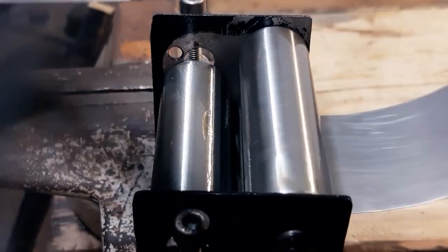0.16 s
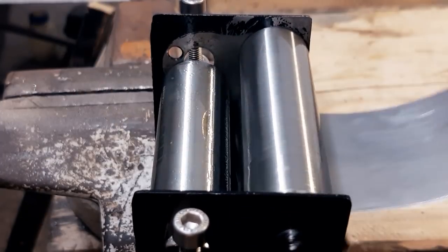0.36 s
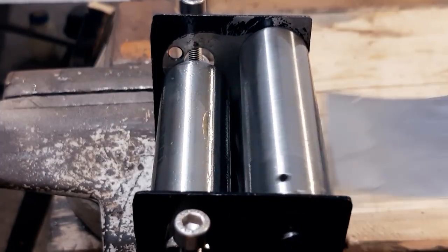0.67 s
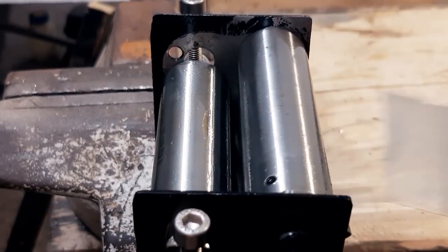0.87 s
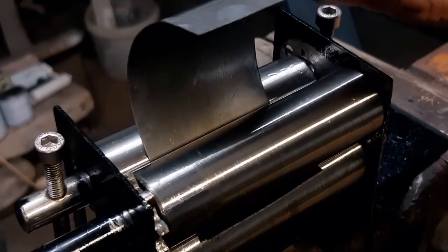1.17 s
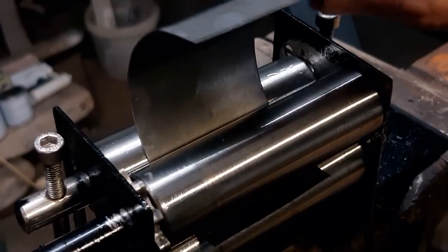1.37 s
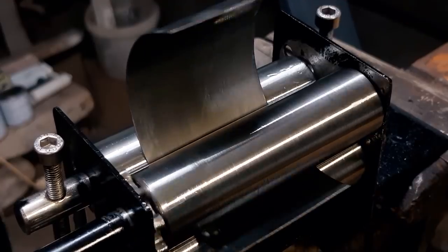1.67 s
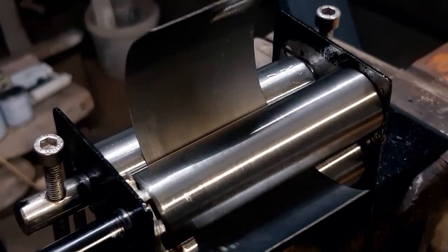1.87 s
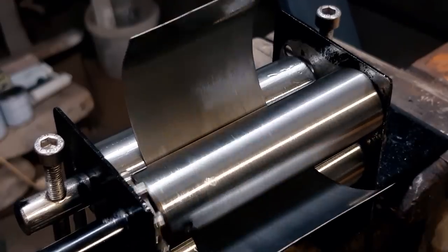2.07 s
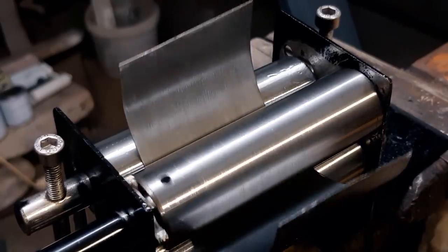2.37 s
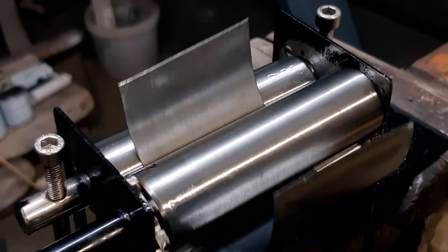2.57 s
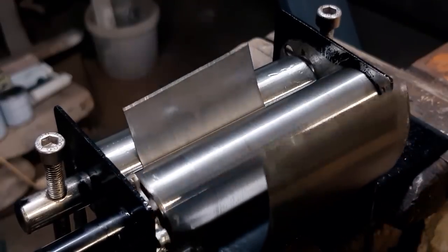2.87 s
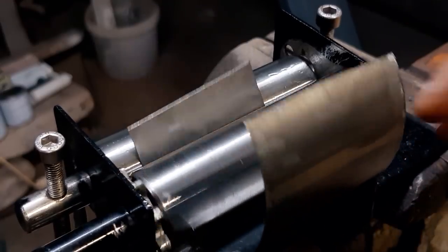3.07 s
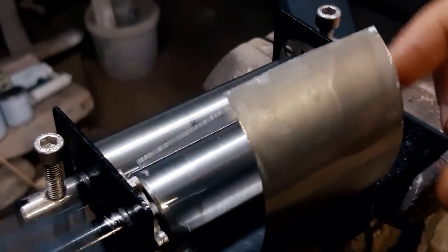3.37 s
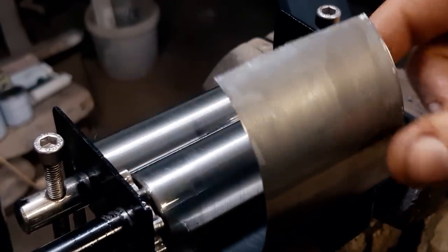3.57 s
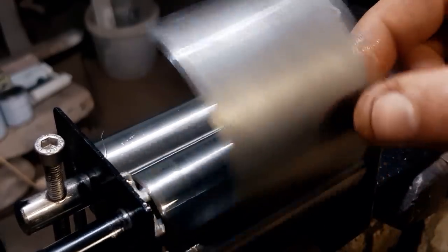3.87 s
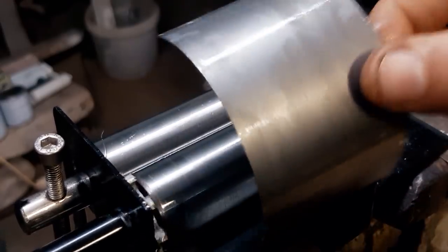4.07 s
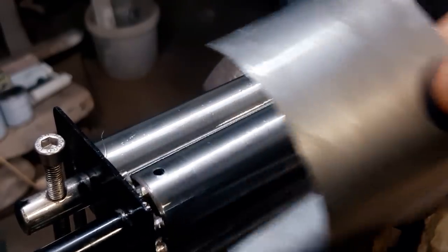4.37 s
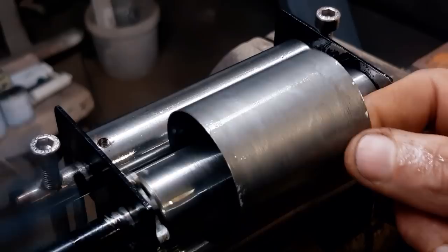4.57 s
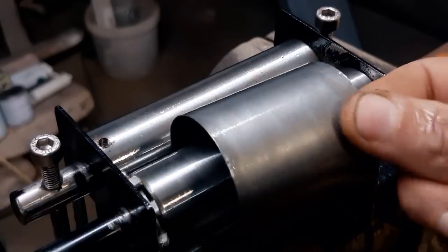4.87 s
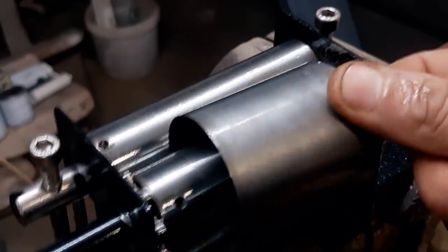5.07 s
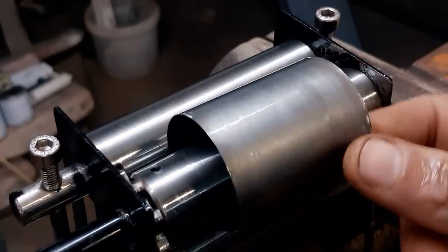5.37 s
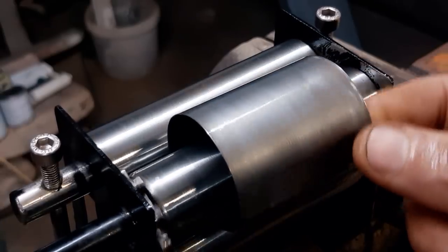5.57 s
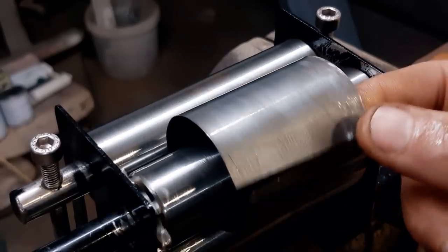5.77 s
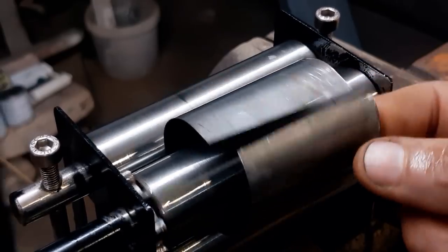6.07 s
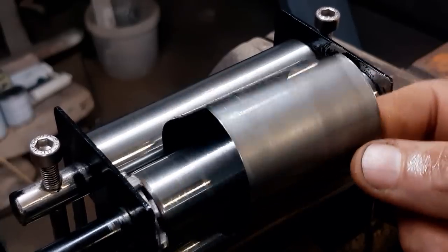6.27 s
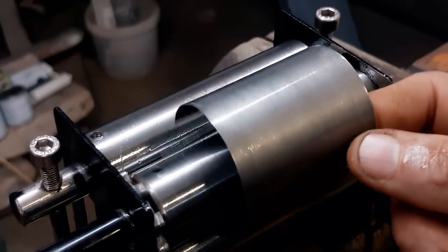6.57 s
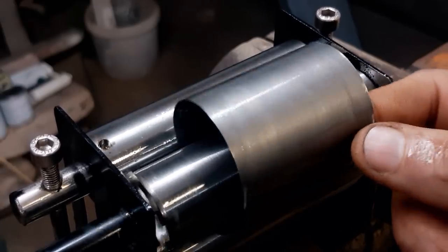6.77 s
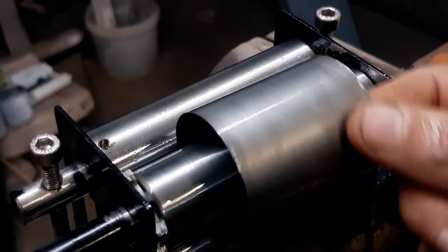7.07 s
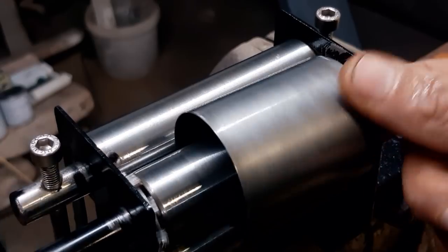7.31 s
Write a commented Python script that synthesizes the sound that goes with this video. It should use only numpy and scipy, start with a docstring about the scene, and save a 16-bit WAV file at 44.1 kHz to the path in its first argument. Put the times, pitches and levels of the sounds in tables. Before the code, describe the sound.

Close stereo microphone at a workshop bench roller. A thin metal sheet slides through with fine, very high hiss and coarser rasp, first in small scuffs and ticks, then a quieter stretch with faint squeals. Sharp snaps follow, the loudest single tick about midway, and the second half grows busy with clacks, rustles and scrapes. Soft vice knocks and a low wavering bench hum sit beneath steady room air.

```python
"""In a workshop, a thin metal sheet is cranked through a small bench roller, close to a two-port microphone.
The sheet hisses and rasps on the rolls (shaped noise and tiny clicks) and snaps on steel (short noise
bursts through resonances, with a room tail). Thin squeals glide up and down (wandering sines). Below, the
bench hums and swells in its low modes (wavering sines) and the vice rings when knocked (noise through
resonances), all over the steady air of the workshop."""
import sys
import numpy as np
from scipy import signal
from scipy.fft import rfft, irfft, next_fast_len
from scipy.io import wavfile
from scipy.ndimage import uniform_filter1d, map_coordinates

SR = 44100
rng = np.random.default_rng(int(sys.argv[2]) if len(sys.argv) > 2 else 0)


def unload_audio(sound):
    """Save the sound as a 16-bit wav file, at the path given as the first command line argument."""
    columns = np.transpose(np.atleast_2d(sound))
    # keep every value between -1 and 1, then stretch to whole-number steps
    steps = np.round(np.clip(columns, -1, 1) * 32767)
    wavfile.write(sys.argv[1], SR, steps.astype(np.int16))


N = 328104  # samples

# Steady air of the workshop, relative spectrum: (frequency [Hz], density [dB per Hz])
AIR_SPECTRUM = [(12, -23), (28, 6), (60, 8), (79, -13), (140, -16.5), (238, -28.5), (296, -24.5),
                (456, -34.5), (703, -31.5), (1130, -44), (2200, -55), (2860, -64), (4840, -120)]
# Steady friction on the rolls: (time [s], hiss level [dB], rasp level [dB])
FRICTION = [(0.0, -68, -83), (0.6, -62, -74), (0.78, -63.5, -79.5), (1.06, -60.5, -77),
            (1.45, -65.5, -77.5), (1.8, -61, -75), (2.25, -52.5, -67), (2.75, -64.5, -73.5),
            (3.2, -65, -77.5), (3.5, -61.5, -77), (3.8, -66.5, -86), (3.9, -54, -73), (4.3, -61.5, -72.5),
            (4.58, -68.5, -90), (4.66, -60, -74), (5.1, -56.5, -67.5), (5.42, -63.5, -76.5),
            (6.15, -60, -78), (6.36, -56.5, -67), (7.44, -53, -72)]
# Scuffs and rustles of the sheet; rise and fall each span 20 dB:
# (peak time [s], rise [s], fall [s], hiss level [dB], fizz level [dB], rasp level [dB])
SCUFFS = [(0.165, 0.18, 0.15, -54.5, -67.5, -69), (0.289, 0.01, 0.1, -50, -63, -63),
          (0.483, 0.1, 0.098, -48, -54.5, -63), (0.688, 0.13, 0.045, -61, -66, -64.5),
          (0.883, 0.16, 0.1, -60.5, -90, -103), (1.596, 0.096, 0.14, -56.5, -82, -76),
          (1.866, 0.068, 0.86, -56, -76, -81), (2.03, 0.034, 0.046, -40, -67, -76),
          (2.7, 0.14, 0.55, -56, -75, -73), (3.058, 0.0085, 0.15, -52.5, -93, -70.5),
          (3.403, 0.02, 0.097, -37.5, -65, -62.5), (3.885, 0.043, 0.042, -48.5, -76, -70),
          (4.04, 0.037, 0.064, -51.5, -70, -61.5), (4.144, 0.013, 0.088, -39.5, -57, -59),
          (4.425, 0.065, 0.13, -78, -95, -63.5), (4.633, 0.027, 0.12, -53, -75, -59),
          (4.744, 0.084, 0.03, -55, -72, -67.5), (4.843, 0.036, 0.12, -39.5, -60.5, -62.5),
          (4.828, 0.0084, 0.03, -36, -75, -54), (4.964, 0.12, 0.12, -40, -65.5, -55.5),
          (5.602, 0.14, 0.58, -53, -76.5, -74), (6.356, 0.31, 0.61, -50.5, -73, -89),
          (6.49, 0.045, 0.57, -53, -87, -65.5), (6.69, 0.066, 0.037, -40, -60.5, -74),
          (6.88, 0.26, 0.011, -48.5, -73, -68.5), (7.099, 0.032, 0.069, -45, -68, -57.5),
          (7.363, 0.11, 0.16, -49.5, -70, -61)]
# Relative spectra of the three rubbing noises: (frequency [Hz], density [dB per Hz])
HISS_SPECTRUM = [(7500, -49), (9500, -25), (11000, -10), (12500, -4), (14000, 2), (15300, 2), (16000, 0)]
FIZZ_SPECTRUM = [(4500, -30), (6900, -6.5), (8300, -15.5), (10000, -4.5), (12500, -14)]
RASP_SPECTRUM = [(450, -28), (750, -12.5), (1100, -22.5), (1500, -15.5), (1950, -19), (2180, -8.5),
                 (2900, -4), (4000, -2), (5500, -4), (6800, -7), (9000, -52)]
# The rasp narrows towards one band and widens again several times:
# (time [s], narrowed share [0-1], band centre [Hz], level of the rasp's low end [dB])
NARROWING = [(0, 0.56, 3700, -1), (1.9, 0.2, 3150, -0.5), (2.5, 0.36, 3300, -1), (2.9, 0.77, 3700, -3.5),
             (3.35, 0.57, 4010, -3), (3.45, 0.5, 3930, 2.5), (4.8, 0.13, 4020, 2), (5.05, .05, 4000, 9.5),
             (5.2, 0.77, 4400, 2), (5.6, 0.42, 4200, 1.5), (7.44, 0.03, 3900, 3.5)]
# How hard rolling and handling shake the vice and bench: (time [s], level [dB])
LOAD = [(0.0, -92), (0.6, -72.5), (1.41, -94.5), (2.38, -78), (3.32, -96), (3.9, -83), (4.06, -77.5),
        (5.16, -71.5), (5.39, -82), (6.07, -80), (6.67, -72), (7.44, -70.5)]
# Bench modes: (pitch [Hz], pitch wander [Hz], level over the shaking [dB])
BENCH_MODES = [(44.47, 2.933, 14), (60.65, 3.56, 6.5), (82.8, 1.5, 4.5), (91, 1.73, 2.5),
               (106.1, 2.7, -4.5)]
# Pushes on crank and bench, one list a mode; rise and fall each span 20 dB:
# (peak time [s], rise [s], fall [s], level [dB])
BENCH_SWINGS = [
    [(.81, 0.46, 0.22, -44), (2.1, 0.65, 0.26, -59.5), (2.55, 0.27, 0.24, -63.5), (4.48, 0.39, 0.13, -63.5),
     (5.72, 0.62, 0.43, -54.5), (6.6, 0.33, 0.41, -56), (7.13, 0.23, 0.13, -49), (7.38, 0.25, 0.85, -46.5)],
    [(2.36, 0.11, 0.39, -61.5), (2.8, 0.099, 0.062, -58.5), (4.22, 0.15, 0.072, -59.5),
     (4.7, 0.089, 0.03, -50), (5.14, 0.25, 0.12, -46.5), (5.6, 1, 0.14, -57), (6.62, 0.25, 0.35, -53.5),
     (7.27, 0.11, 0.19, -57)],
    [(6.24, 0.43, 0.86, -64.5)],
    [(6.85, 0.085, 0.79, -59.5), (7.15, 0.24, 0.39, -53.5)],
    [(.54, 0.15, 0.27, -71.5), (2.4, 0.14, 0.41, -70.5), (4.7, 0.17, 0.068, -60), (6.5, 0.089, 0.37, -69.5)],
]
# The bench stiffens or slackens under the hands: (time [s], pitch change of all modes [%])
STIFFENING = [(.9, -3), (1.4, 2), (4.9, 0), (5.8, -3), (6.2, 2.5), (7.44, 4)]
# The vice and its jaws: (mode pitch [Hz], bandwidth [Hz], relative level [dB])
VICE_MODES = [(178.4, 10.6, 3), (261.2, 9.3, -3.5), (297.1, 19, -3.5), (740, 24, -24), (850, 11, -16.5)]
# Hand and crank knock the vice: (time [s], lowest mode peak [dB], upper modes peak [dB])
KNOCKS = [(0.13, -72, -77), (0.289, -76, -64), (0.48, -70, -57.5), (0.646, -62, -58.5), (1.014, -84, -69.5),
          (2.119, -72.5, -68), (2.259, -74, -68), (2.5, -68, -66.5), (2.747, -62.5, -73), (3.9, -70, -61.5),
          (4.036, -60, -60), (4.134, -61, -55.5), (4.179, -71.5, -64.5), (4.335, -69.5, -67),
          (4.429, -87, -67), (4.475, -84, -62), (4.639, -61.5, -59.5), (4.955, -64.5, -54),
          (5.33, -71, -68.5), (5.56, -68, -66.5), (6.477, -70, -56.5), (6.976, -61, -59.5),
          (7.06, -71, -64), (7.345, -62.5, -62)]
# The sheet snaps on steel:
# (time [s], tick peak [dB], clack level [dB], clack pitch [Hz], left over right [dB])
SNAPS = [(0.091, -36, -67, 5050, -4), (0.2793, -28.5, -43.5, 3180, 5), (0.331, -40, -60, 2775, 5),
         (0.4812, -37, -47, 3450, -1), (0.6238, -73, -59.5, 3100, 0.5), (0.685, -46.5, -58, 4070, 0),
         (0.823, -44, -74, 2970, 11), (1.857, -41, -72, 3180, 3), (2.0195, -23.5, -64, 4450, 3),
         (2.033, -33, -62, 4260, 7), (2.1997, -34, -59.5, 5600, 7), (2.25, -42, -54, 3170, -3),
         (2.6596, -33, -65, 3780, 1), (2.726, -35, -68, 3820, 2), (3.051, -25.5, -68, 3720, 7),
         (3.3927, -9.5, -48.5, 5600, -5), (3.877, -29, -54.5, 5240, -11), (3.8858, -26.5, -50, 5160, -5),
         (3.9557, -39, -70, 4360, 3), (4.0247, -73, -54.5, 1820, -1), (4.025, -39, -56.5, 3830, -12),
         (4.139, -32, -48.5, 3140, 2), (4.146, -25.5, -34, 4800, -2.5), (4.4146, -46.5, -49.5, 3720, -4),
         (4.6162, -41, -67, 5300, 6), (4.7497, -36, -73, 3740, -1), (4.8406, -16.5, -48, 5600, 2),
         (4.9525, -32, -39, 3640, -3), (5.001, -29.5, -60, 4030, 0), (5.33, -56, -67, 1280, -2),
         (5.487, -70, -64, 4780, -14), (5.9269, -43, -73, 3600, -1), (6.2206, -29.5, -59.5, 4900, 0),
         (6.2552, -43, -62, 6200, -8), (6.3542, -32.5, -58, 4340, -8.5), (6.4759, -36, -53.5, 3350, 3),
         (6.566, -35, -53, 4050, -2), (6.6, -46, -53.5, 3400, 2), (6.6387, -26, -46.5, 3730, -3),
         (6.6441, -11, -45, 4600, 4), (6.679, -41, -53, 4960, -8), (6.6855, -34, -51, 3970, 1),
         (6.7432, -30, -57, 5930, 1), (6.8366, -37, -57.5, 5800, -3), (6.876, -36, -51.5, 5450, -2),
         (6.97, -35.5, -58, 4960, -6), (6.989, -32.5, -59.5, 4020, 3), (7.0298, -56, -49.5, 3000, 0),
         (7.0872, -26.5, -50, 5030, -3), (7.1052, -34, -71, 4670, 9), (7.117, -36, -74, 3520, 19),
         (7.346, -30.5, -44, 3420, -4)]
# Relative spectrum of a tick: (frequency [Hz], density [dB per Hz])
TICK_SPECTRUM = [(4120, -62), (7000, -24), (8360, -38), (8900, -26), (11400, -7.5), (13200, -1), (14800, 2),
                 (15700, 7), (16900, -56)]
# How fast the room dies away: (frequency [Hz], time to fall 60 dB [s])
ROOM_DECAY = [(1500, 0.2), (5000, 0.22), (15000, 0.076)]
# Gliding squeals, one list each: (time [s], pitch [Hz], level [dB])
SQUEALS = [
    [(.72, 11000, -84), (.768, 12260, -65), (.82, 12800, -70), (.88, 13650, -65), (.94, 13400, -69),
     (1.06, 13900, -66)],
    [(1.07, 14500, -72), (1.13, 15200, -68), (1.17, 14700, -70), (1.27, 14350, -68), (1.34, 13400, -74),
     (1.44, 10400, -86)],
    [(3.22, 11300, -78), (3.25, 12100, -70), (3.29, 12500, -72), (3.33, 13400, -72), (3.39, 14050, -72)],
    [(3.47, 13500, -73), (3.56, 14500, -72), (3.62, 13550, -67), (3.71, 13400, -66), (3.75, 12000, -78),
     (3.79, 10600, -90)],
]
# How loud the side strands are, one value a squeal: (level [dB])
FRAYING_DB = (-8, 1, -2, -2)

AIR_DB = -65.5
FIZZ_DB = -22  # steady fizz against the hiss
BANDS_HZ, BAND_WIDTH_HZ, LOW_END_HZ = (3100, 4300), 1300, 2000  # narrowed rasp
BENCH_FOLLOWS = 0.39  # share of the load's swings in dB that the bench follows
PUSH_RISE_S, PUSH_FALL_S = 0.0025, 0.013  # time constants of a knock on the vice
CLACK_CREST_DB = 4.5  # peak of a clack over its level
SNAP_LEAD_IN = 256  # samples kept ahead of each snap
LOW_PASS_HZ = 15850  # low-pass applied to rubbing and room tails; direct ticks bypass it
TOP_HZ = 17087  # band limit of the whole scene
LEFT_LEAD_S, LEAD_FADES_HZ = 9e-5, 3000  # the left port hears low sounds first


def amp(db):
    """Decibels to gain."""
    return 10 ** (np.asarray(db) / 20)


def unit(x):
    """x at rms 1."""
    return x / np.sqrt(np.mean(x ** 2) + 1e-20)


def along(points, hz):
    """Interpolate (frequency, value) points on a log frequency axis."""
    f, v = np.transpose(points)
    return np.interp(np.log(hz + 1), np.log(f + 1), v)


def curves(rows):
    """One value per sample for each column after the time."""
    s, *cols = np.transpose(rows)
    return [np.interp(np.arange(N) / SR, s, c) for c in cols]


def wobble(rate):
    """A smooth random curve around zero, rate knots a second."""
    steps = np.arange(0, N + 32, 32)
    knots = rng.standard_normal(int(N * 400 / SR))
    return np.interp(np.arange(N), steps, map_coordinates(knots, [steps * rate / SR]))


def swells(rows):
    """Gain per sample for each dB column: every row rises to its peak and falls away, evenly in dB."""
    now = np.arange(0, N + 64, 64) / SR
    s, rise, fall, *cols = np.transpose(rows)[:, :, None]
    shape_db = -20 * np.maximum((s - now) / rise, (now - s) / fall)
    gains = [np.sqrt(np.sum(amp(2 * (db + shape_db)), axis=0)) for db in cols]
    return [np.interp(np.arange(N) / SR, now, gain) for gain in gains]


def filtered(x, response):
    """x passed through a response given as a function of frequency."""
    m = next_fast_len(x.shape[-1] + 8192)
    return irfft(rfft(x, m) * response(np.fft.rfftfreq(m, 1 / SR)), m)[..., :x.shape[-1]]


def resonance(f, centre, width):
    """Response of one damped mode, 1 at its centre."""
    return 1j * f * width / (centre ** 2 - f * f + 1j * f * width)


def rush(spectrum, alike, grit_db, patchy_db):
    """Stereo noise of rms 1: gritty in short bursts, patchy in time and pitch; alike is the port correlation."""
    z = signal.stft(rng.standard_normal((2, N + 512)), nperseg=512)[2]
    field = rng.standard_normal(z.shape[1:])
    for axis in (0, 1):
        field = uniform_filter1d(field, size=8, axis=axis)
    a, b = signal.istft(z * amp(patchy_db * unit(field)), nperseg=512)[1][:, :N]
    turn = np.arccos(np.clip(alike, -1, 1)) / 2
    pair = np.array([a + np.tan(turn) * b, a - np.tan(turn) * b])
    grit = amp(grit_db * (wobble(300) + wobble(60)))
    return unit(filtered(pair * grit, lambda hz: amp(along(spectrum, hz))))


def workshop_air():
    """The steady background around the bench: shaped noise, strongest in the lows."""
    return amp(AIR_DB) * rush(AIR_SPECTRUM, alike=.6, grit_db=.3, patchy_db=1.1)


def narrowed(rasp):
    """Above its low end, the rasp blends by a varying share into one band that moves between two centres."""
    share, band_hz, low_db = curves(NARROWING)
    share, up = np.clip(share, 0, 1), np.interp(band_hz, BANDS_HZ, (0, 1))
    lower, upper = [unit(filtered(rasp, lambda f: np.abs(resonance(f, c, BAND_WIDTH_HZ)) ** 2))
                    for c in BANDS_HZ]
    low = filtered(rasp, lambda f: f < LOW_END_HZ)
    band = (1 - up) * lower + up * upper
    return (1 - share) * (rasp - low) + share * band + amp(low_db) * low


def crackles(gain, low_hz, octaves, count):
    """Grit under the sheet: tiny one-off clicks of random pitch that follow the rubbing level."""
    when, pitch, size, side = rng.random((count, 4)).T
    t, at = np.arange(96) / SR, (when * (N - 96)).astype(int)
    hz = low_hz * 2 ** (octaves * pitch[:, None])
    level = gain[at] * amp(3 - 3.5 * np.log(size + .03))  # a few stand out
    grains = np.sin(2 * np.pi * hz * t) * np.exp(-t * hz / 1.9) * (1 - np.exp(-t * hz)) * level[:, None]
    places = (at[:, None] + np.arange(len(t))).ravel()
    return np.array([np.bincount(places, (grains * share[:, None]).ravel(), N)
                     for share in (side, 1 - side)])


def rubbing():
    """The sheet slides on the rolls: fine hiss and fizz over a coarser rasp, catching together, with grit."""
    hiss_db, rasp_db = curves(FRICTION)
    steady = amp(hiss_db), amp(hiss_db + FIZZ_DB), amp(rasp_db)
    hiss_gain, fizz_gain, rasp_gain = map(np.hypot, steady, swells(SCUFFS))
    catch = amp(0.87 * wobble(25))
    hiss = rush(HISS_SPECTRUM, alike=.05, grit_db=.9, patchy_db=.8)
    fizz = rush(FIZZ_SPECTRUM, alike=.05, grit_db=1.2, patchy_db=1.6)
    rasp = narrowed(rush(RASP_SPECTRUM, alike=.08, grit_db=1.55, patchy_db=1.7))
    coarse_grit = crackles(rasp_gain, low_hz=2200, octaves=1.7, count=600)
    fine_grit = amp(2.0) * crackles(hiss_gain, low_hz=12500, octaves=0.16, count=500)
    friction = catch * (hiss_gain * hiss + fizz_gain * fizz + rasp_gain * rasp)
    return amp([[-.6], [.6]]) * friction + coarse_grit + fine_grit


def bench():
    """Each mode hums with the shaking and swells when pushed; pitch and strength waver at random."""
    out = np.zeros((2, N))
    load_db, = curves(LOAD)
    stiffening, = curves(STIFFENING)
    shake_db = load_db.mean() + BENCH_FOLLOWS * (load_db - load_db.mean())
    for (hz, wander_hz, db), rows in zip(BENCH_MODES, BENCH_SWINGS):
        apart = 0.3 + 0.36 * wobble(2.4)  # radians; the two ports hear the mode out of step
        hum = amp(shake_db + db + 3.78 * wobble(12) + 2.2 * wobble(4.3))
        swing = swells(rows)[0] * amp(2.5 * wobble(21))
        gain = np.hypot(hum, swing)
        wander = wander_hz * wobble(13) * hum / gain  # a free swing holds its pitch
        pitch = hz * (1 + stiffening / 100) + wander
        phase = 2 * np.pi * np.cumsum(pitch) / SR
        out += np.sqrt(2) * gain * np.sin([phase + apart, phase - apart])
    return out * amp([[-2.5], [2.1]])


def vice_response(rows):
    """Sum of the vice's modes, alternating in sign."""
    return lambda f: sum((-1) ** k * amp(db) * resonance(f, hz, width)
                         for k, (hz, width, db) in enumerate(rows))


def vice():
    """Rolling shakes the vice all the time; soft blows ring it briefly, each mixing low and upper modes."""
    shared, own = rng.standard_normal(N), rng.standard_normal((2, N))
    load_db, = curves(LOAD)
    out = amp(load_db) * unit(filtered(shared + 0.55 * own, vice_response(VICE_MODES)))
    t = np.arange(SR // 4) / SR
    for s, *levels_db in KNOCKS:
        at = round(s * SR)
        noise = rng.standard_normal(len(t)) + 0.5 * rng.standard_normal((2, len(t)))
        push = noise * (1 - np.exp(-t / PUSH_RISE_S)) * np.exp(-t / PUSH_FALL_S)
        for rows, db in zip((VICE_MODES[:1], VICE_MODES[1:]), levels_db):
            ring = filtered(push, vice_response(rows))[:, :N - at]
            out[:, at:at + len(t)] += amp(db) * ring / np.abs(ring).max()
    return out * amp([[-.8], [.8]])


def room_tail(x):
    """A fresh noise tail for one snap; each frequency dies at its own speed."""
    hz, t, z = signal.stft(rng.standard_normal((2, SR // 5)), SR, nperseg=256)
    decay = amp(-60 * t / along(ROOM_DECAY, hz)[:, None])
    tail = signal.istft(z * decay, SR, nperseg=256)[1]
    return signal.fftconvolve(x, tail / np.linalg.norm(tail[0]), axes=1)


def snap_burst(t, t60):
    """Partly shared stereo noise that starts fast and dies in a short and a long slope."""
    def shape(slope_t60):
        fade = (1 - np.exp(-np.abs(t) / (t60 / 8))) * amp(-60 * np.abs(t) / slope_t60)
        return np.where(t > 0, fade, 0)
    noise = 1.09 * rng.standard_normal(len(t)) + rng.standard_normal((2, len(t)))
    return noise * (shape(t60) + 0.27 * shape(5.94 * t60))


def clack_response(hz):
    """The curved sheet as a whole and its free edge resonate; it radiates little outside its band."""
    low_hz = min(2300, 0.63 * hz)

    def response(f):
        whole_sheet = resonance(f, 4300, 4000)
        free_edge = resonance(f, hz, 800)
        radiation = f ** 4 / (f ** 4 + low_hz ** 4) / (1 + (f / 7500) ** 4)
        return (0.47 * whole_sheet + free_edge) * radiation
    return response


def snaps():
    """Each snap is a bright tick and a duller clack; returns the direct sound and the shop's answer."""
    direct, answer = np.zeros((2, N + SR)), np.zeros((2, N + SR))
    t = np.arange(-SNAP_LEAD_IN, 1792) / SR
    for s, tick_db, clack_db, hz, pan_db in SNAPS:
        tick = filtered(snap_burst(t, .002), lambda f: amp(along(TICK_SPECTRUM, f)))
        clack = filtered(snap_burst(t, .0072), clack_response(hz))
        hit = amp(tick_db) * tick / np.abs(tick).max(axis=1, keepdims=True)
        hit += amp(clack_db + CLACK_CREST_DB) * clack / np.abs(clack).max(axis=1, keepdims=True)
        at = round(s * SR) - SNAP_LEAD_IN
        direct[:, at:at + len(t)] += hit * amp(pan_db * np.array([[.5], [-.5]]))
        tail = amp(-11) * room_tail(hit)
        answer[:, at + 60:at + 60 + tail.shape[1]] += tail  # 60 samples after the hit
    return direct[:, :N], answer[:, :N]


def squeals():
    """Thin, frayed gliding tones: sines of unsteady pitch, with flickering strands above and below."""
    out, now = np.zeros((2, N)), np.arange(N) / SR
    hz, db = curves([row for rows in SQUEALS for row in rows])
    # each squeal opens and closes over 12 ms
    gates = np.array([np.clip(np.minimum(now - rows[0][0], rows[-1][0] - now) / .012, 0, 1)
                      for rows in SQUEALS])
    main, beside = gates.sum(axis=0), amp(FRAYING_DB) @ gates
    # (gate, pitch offset as a share, level [dB], flicker [dB])
    strands = (main, 0, 3, 1.5), (beside, .038, -2, 3), (beside, -.033, -5, 4)
    for sounding, apart, strand_db, flicker_db in strands:
        pitch = hz * (1 + apart * (1 + .25 * wobble(8))) + 60 * wobble(160)
        level = amp(db + strand_db + flicker_db * wobble(16) + 2 * wobble(180))
        phase = 2 * np.pi * np.cumsum(pitch) / SR
        out += sounding * level * np.sin(phase + np.array([[0], [1.4]]))
    return out


def scene():
    """All sources over the steady air of the workshop."""
    air = workshop_air()
    direct, answer = snaps()
    lasting = filtered(rubbing() + answer, lambda hz: hz < LOW_PASS_HZ)
    return air + lasting + bench() + vice() + direct + squeals()


def record(dry):
    """The microphone's ports differ a little in phase; nothing is kept above the band limit."""
    def response(hz):
        lead = np.pi * hz * LEFT_LEAD_S / (1 + (hz / LEAD_FADES_HZ) ** 2)
        return (hz < TOP_HZ) * np.exp(1j * lead * np.array([[1], [-1]]))
    return filtered(dry, response)


dry = scene()
out = record(dry)
unload_audio(out)
```